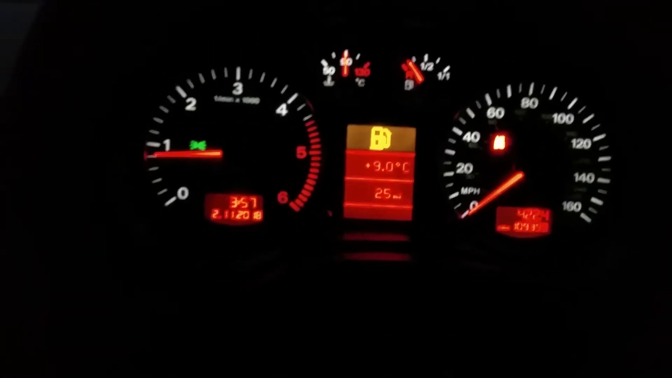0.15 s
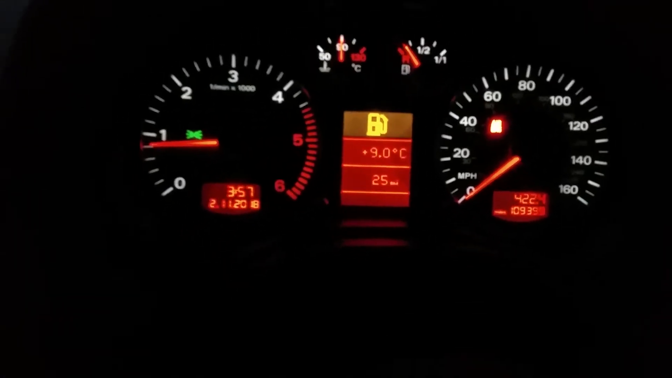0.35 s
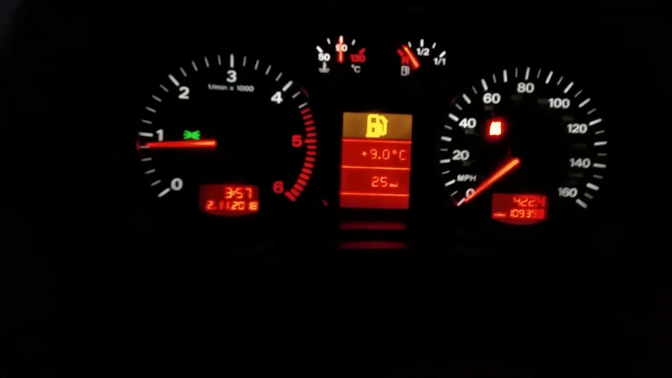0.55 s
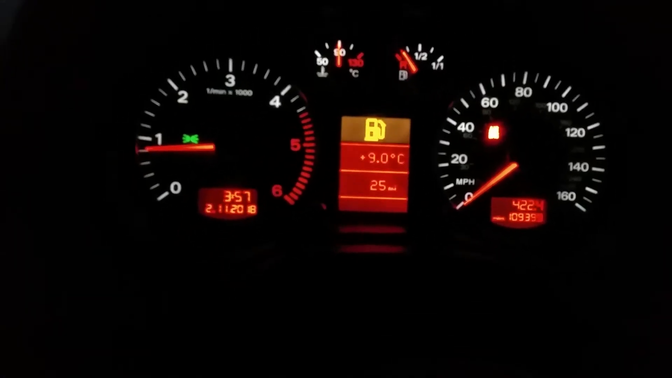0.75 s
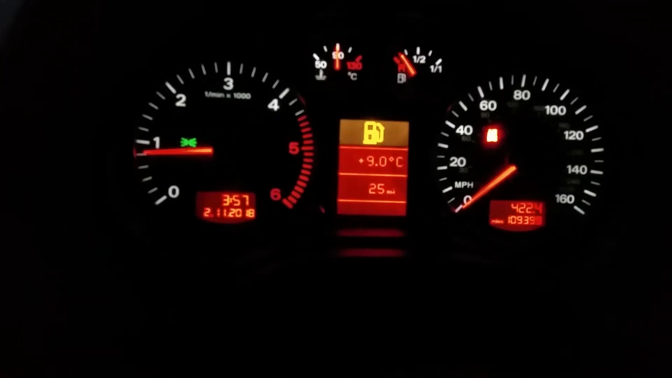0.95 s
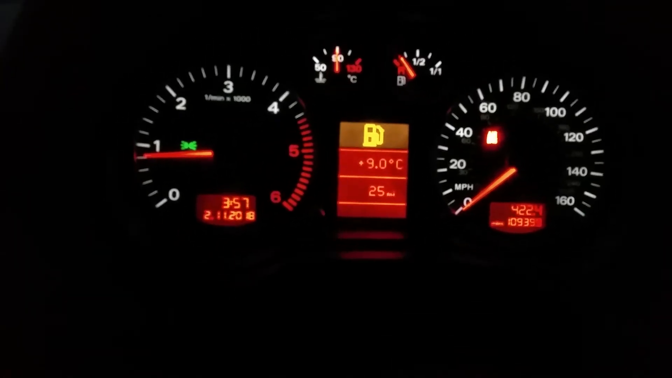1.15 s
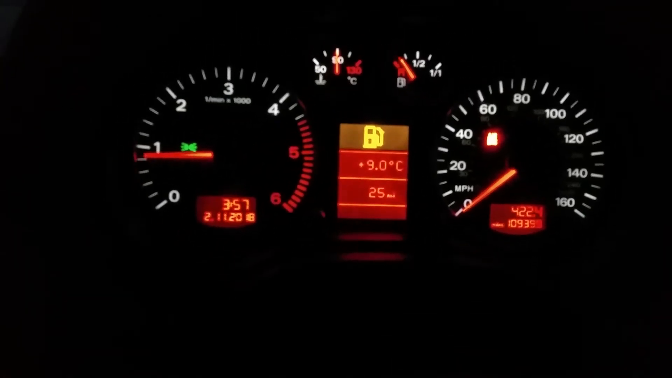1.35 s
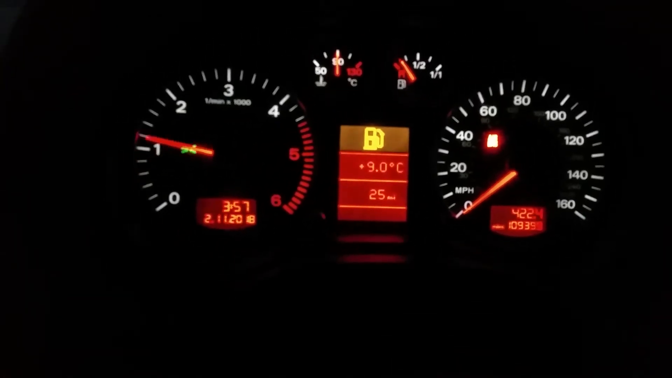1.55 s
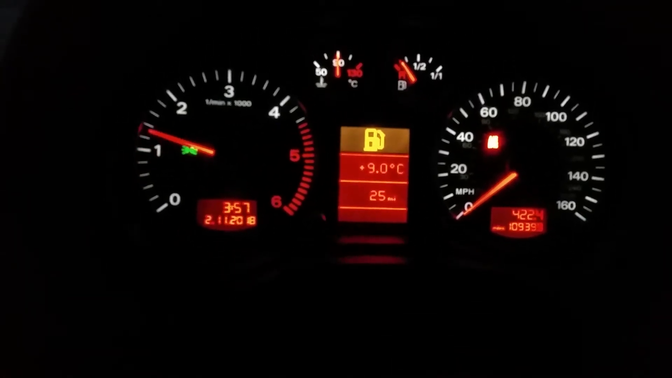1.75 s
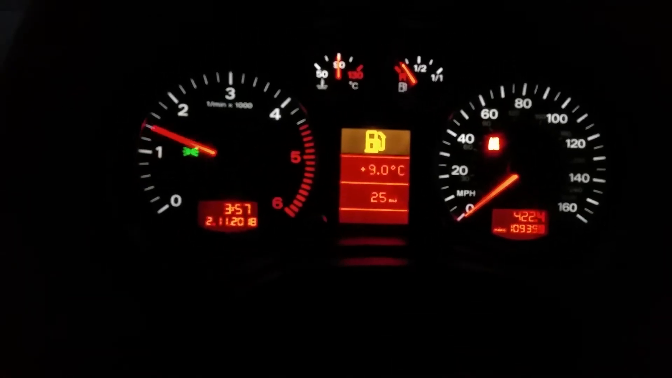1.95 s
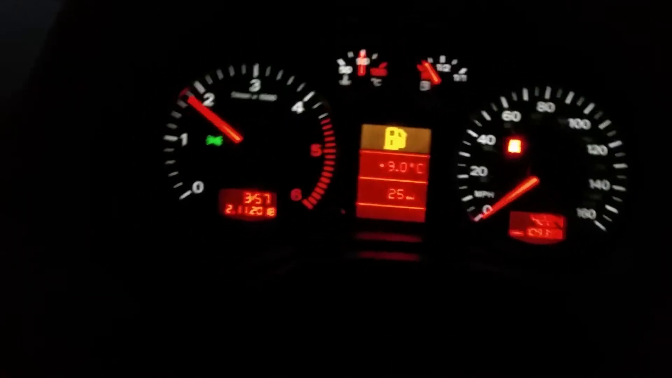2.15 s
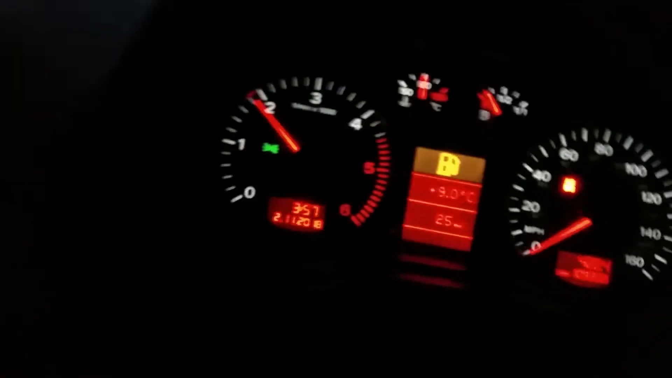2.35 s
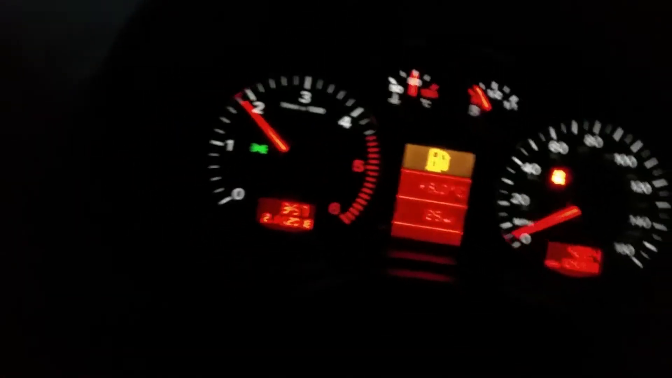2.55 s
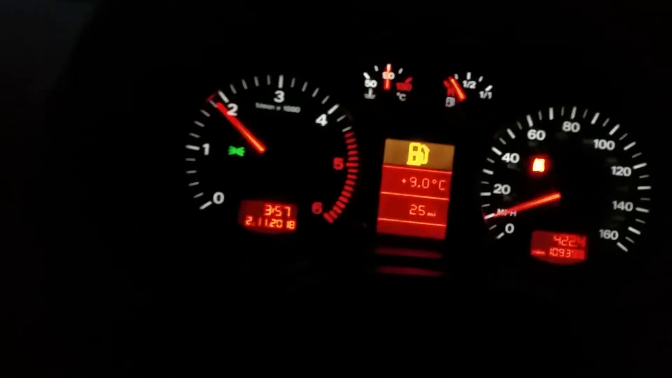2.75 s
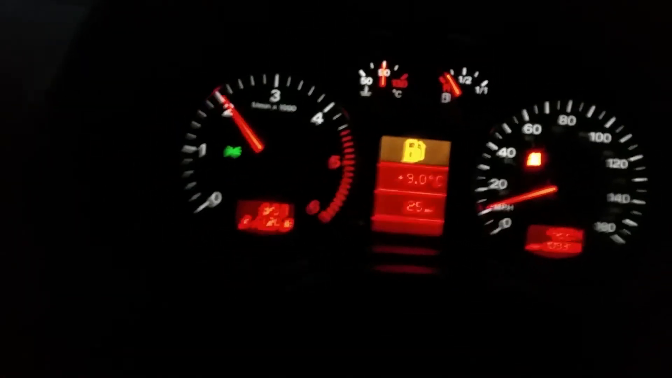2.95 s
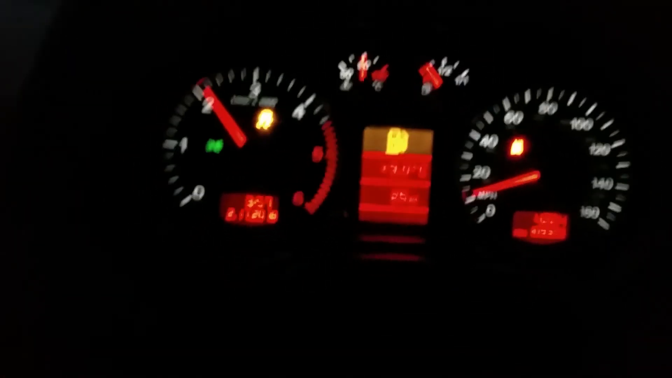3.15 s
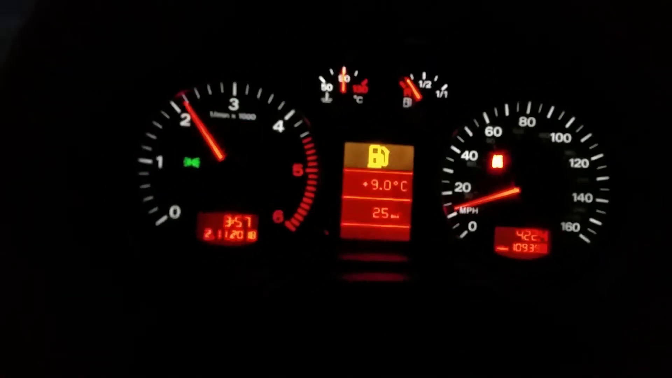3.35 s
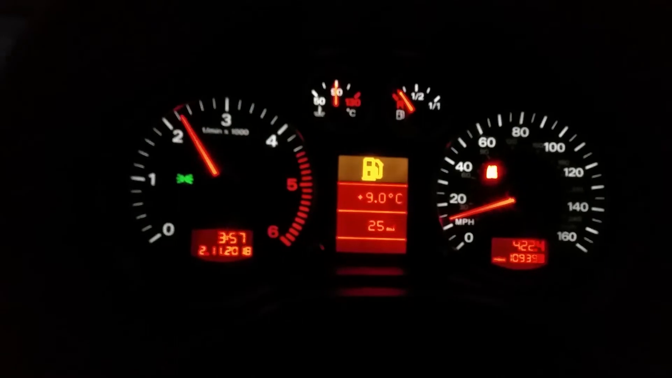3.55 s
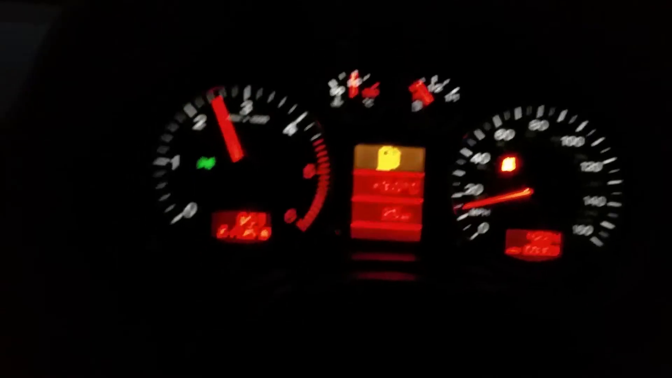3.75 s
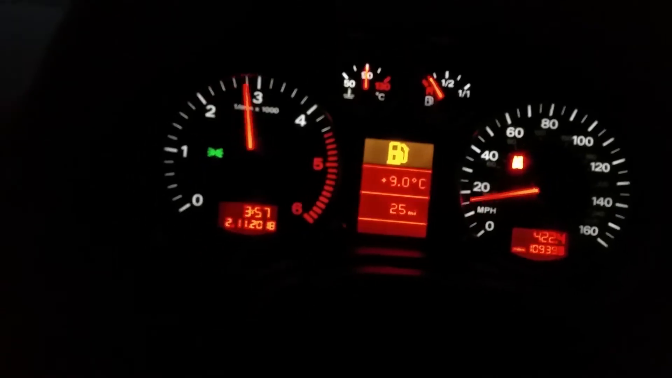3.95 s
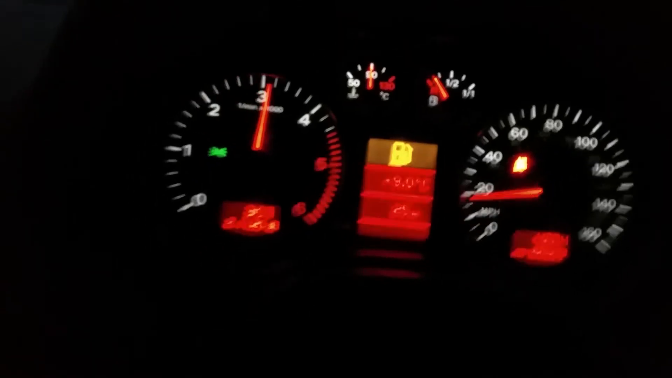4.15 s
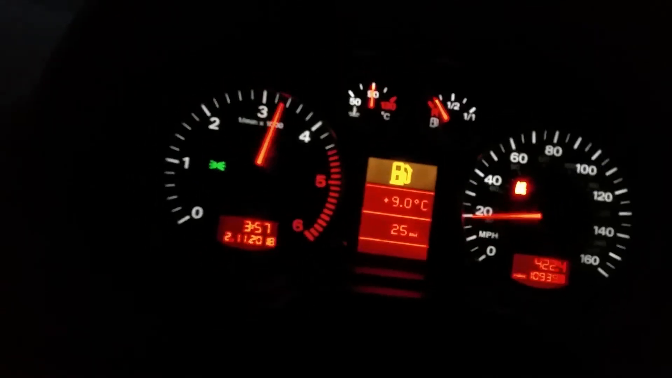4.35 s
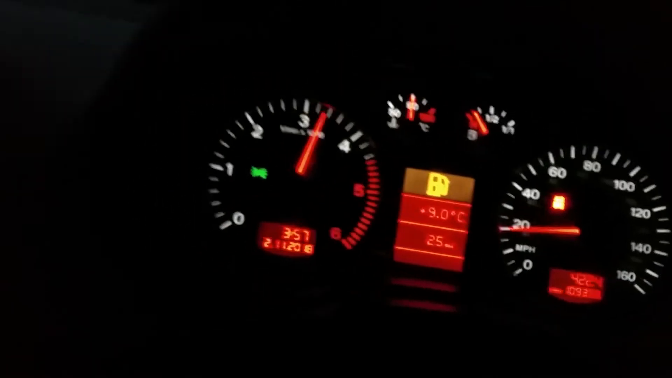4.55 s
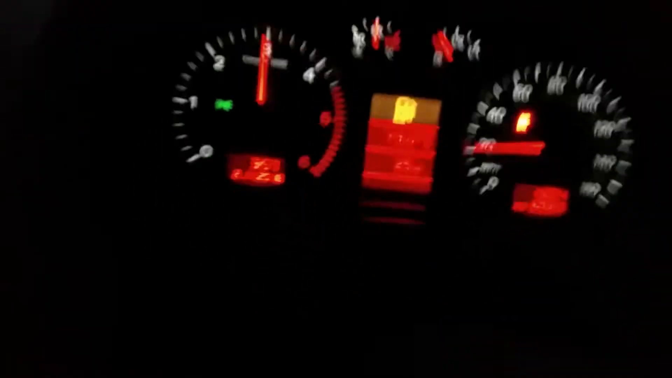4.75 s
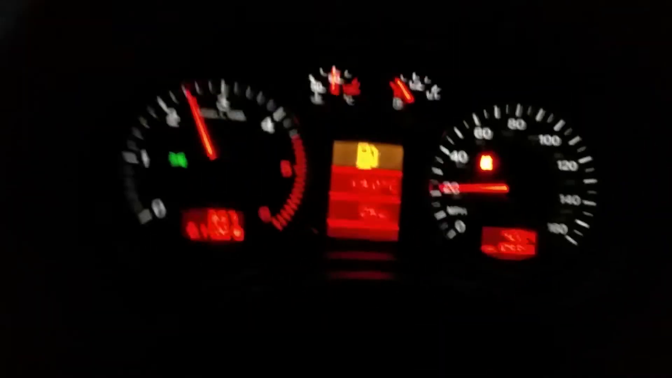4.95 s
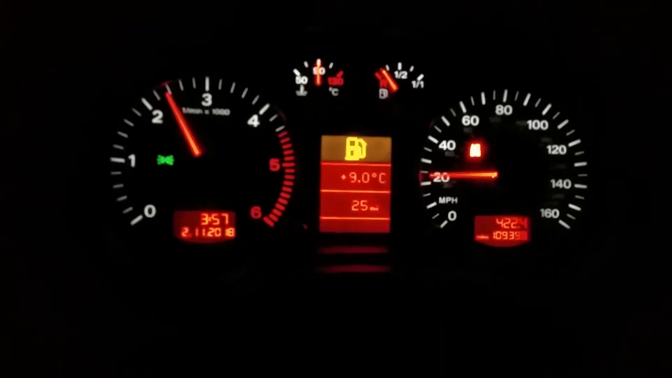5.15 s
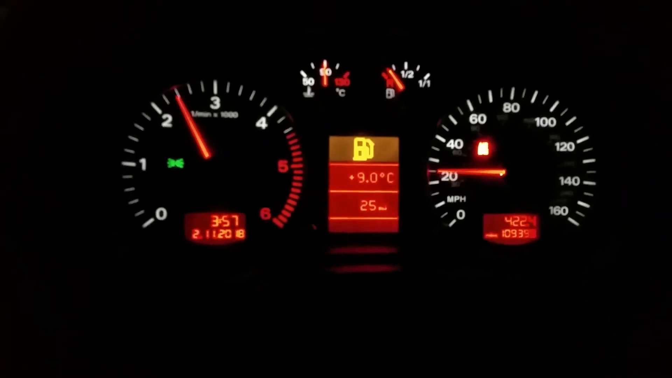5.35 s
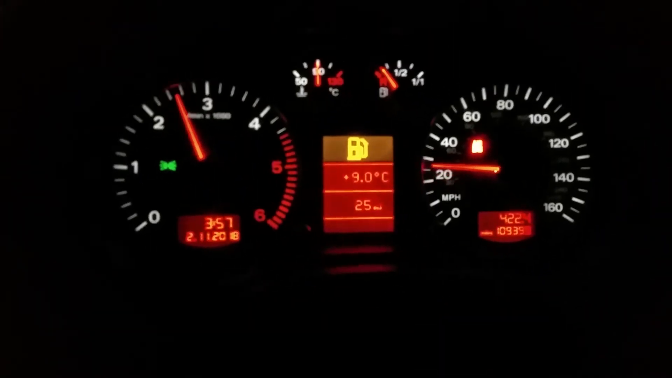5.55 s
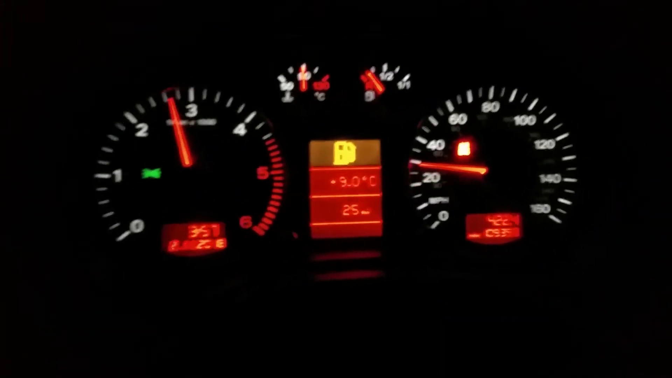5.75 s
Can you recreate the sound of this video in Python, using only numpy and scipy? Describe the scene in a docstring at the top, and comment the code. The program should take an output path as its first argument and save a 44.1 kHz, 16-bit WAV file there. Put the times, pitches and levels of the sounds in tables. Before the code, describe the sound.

A muffled diesel idle with handling bumps and clicks swells into a heavy, bass-rich acceleration, dips at a gear change, then climbs again.

```python
"""A car engine idles, then booms and growls as the car pulls away hard and changes gear, heard inside the cabin.
The four-cylinder turbodiesel is a stack of steady tones locked to its firing rate; some make the cabin boom.
Shaped noise makes the road rumble, the muffled clatter and the microphone hiss.
Thuds are dying tones, fabric rubs are strokes of noise, trim clacks are noise bursts that ring the plastic,
and seat creaks are strings of tiny ticks. A short padded echo follows these small noises."""
import sys
import numpy as np
from scipy import signal
from scipy.io import wavfile
from scipy.ndimage import uniform_filter1d

SR = 44100
rng = np.random.default_rng(int(sys.argv[2]) if len(sys.argv) > 2 else 0)


def materialize(psi):
    """Save the field psi as 16-bit PCM at rate SR to the path in sys.argv[1].

    A 1-D psi becomes a single channel; in a 2-D psi each row is a channel.
    """
    bounded = np.clip(np.atleast_2d(psi).T, -1, 1)
    quanta = np.round(bounded * 32767).astype(np.int16)
    wavfile.write(sys.argv[1], SR, quanta)


N = 255780  # length in samples

# The engine over time. Each row: time in seconds, firing rate in Hz, boom of the first firing order in dB,
# load on the engine, given as the level of its growl in dB.
ENGINE_COURSE = [(0, 28.37, -79, -42), (1.19, 27.64, -54, -58.5), (1.39, 43.4, -40, -40.5),
                 (1.5, 49.5, -31.5, -54.5), (1.62, 47.76, -31, -59), (1.79, 45.27, -40.5, -50.5),
                 (1.96, 54.9, -27.5, -45), (2.1, 65.06, -57, -33.5), (2.21, 64.53, -21.5, -35.5),
                 (2.47, 58.14, -16.5, -35.5), (2.82, 72.38, -14, -33), (3.1, 73.38,  -16.5, -31),
                 (3.41, 76.26, -21, -30.5), (3.5, 80.3, -42, -35), (3.62, 87.9, -34, -24.5),
                 (3.83, 98.85, -14.5, -25), (3.98, 108.3, -19, -17.5), (4.12, 117.4, -26.5, -19.5),
                 (4.22, 115.4, -17, -26.5), (4.51, 106.2, -14.5, -31.5), (4.62, 93.8, -24.5, -25),
                 (4.77, 71.22, -21, -34), (4.94, 75.6, -21.5, -31), (5.23, 82.8, -26, -26),
                 (5.38, 86.2, -15, -21), (5.8, 96.95, -22, -23)]
# Panels and cabin air that ring when an engine order crosses them. Each row: pitch in Hz, width in Hz, boost in dB.
BODY_RESONANCES = [(44.6, 3.6, 5.5), (115.7, 9.7, 4), (171, 40, -2.5), (225, 23, -8), (262.2, 16, 0.5),
                   (355, 28, -5), (406.3, 22, -6), (465, 60, -13), (710, 170, -21)]
# How the cabin passes the second firing order. Each row: pitch in Hz, level over the growl in dB.
SECOND_ORDER = [(56, -34), (86, -11), (93, 23.5), (102, 8.5), (120, 16), (148, 4), (176, 0.5), (198, -9),
                (230, -7.5)]
# The same for the third order, when the load is FULL_DB. Each row: pitch in Hz, level over the growl in dB.
THIRD_ORDER = [(120, -19), (175, 4.5), (222, 0.5), (262, -1.5), (325, -5.5), (348, -9.5)]
# Levels of the engine lines over the growl, in dB: whole orders, then those 1/4, 2/4 and 3/4 above a whole order.
QUARTER_LEVELS = [-3, -4.5, -9, -2]
# Rumble of road and body over time. Each row: time in seconds, level in dB.
RUMBLE_COURSE = [(0, -39), (.5, -34.5), (1.1, -36.5), (1.9, -37.5), (2.06, -20), (2.3, -22), (2.9, -17.5),
                 (3.4, -19), (3.55, -22.5), (4.1, -17.5), (4.55, -18), (4.9, -16.5), (5.8, -18.5)]
# Tone colour of the rumble. Each row: pitch in Hz, relative level per Hz in dB.
RUMBLE_COLOUR = [(21, -36), (36, 13), (45, 10.5), (100, 11), (155, 6), (250, 0), (400, -9.5), (700, -58)]
# Tone colour of the clatter. Each row: pitch in Hz, relative level per Hz in dB.
CLATTER_COLOUR = [(420, -5.5), (800, -11.5), (1150, -15), (1500, -21.5), (2100, -24.5), (2900, -34.5),
                  (3450, -30), (4000, -42), (5500, -42.5), (7500, -61), (12000, -88)]
# Two panels that hum along with the clatter. Each row: pitch in Hz, width in Hz, level over the clatter in dB.
HUMMING_PANELS = [(201.5, 16, -8), (412.8, 45, -15)]
# Tone colour of the microphone hiss. Each row: pitch in Hz, relative level per Hz in dB.
HISS_COLOUR = [(2000, -51), (4000, -5), (7200, -14.5), (11000, -8.5), (16000, -19)]
# How alike noise is left and right. Each row: pitch in Hz, likeness (1 is the same, below 0 is opposed).
LIKENESS = [(60, 0.88), (130, 1), (290, 0.82), (640, 0.67), (1410, -0.5), (3100, 0.24), (7000, -0.37)]
# How noise leans to one side. Each row: pitch in Hz, left minus right in dB.
SIDE_LEAN = [(60, 3), (500, 6), (1300, -1.5), (4400, 0.5), (10000, 3)]
# Bumps through seat and floor. Each row: start in seconds, level in dB, ring in Hz,
# time in seconds to die by 60 dB.
THUDS = [(0.136, -18, 118, 0.059), (0.379, -18.5, 128, 0.24), (0.406, -8.5, 135.4, 0.095),
         (0.458, -23.5, 149, 0.16), (0.656, -17.5, 129.5, 0.21), (0.772, -21.5, 144, 0.21),
         (0.824, -23.5, 85.4, 0.22), (2.047, -23, 142, 0.062), (2.061, -10, 40.5, 0.82),
         (2.573, -15.5, 111, 0.19), (4.726, -13, 73.4, 0.12)]
# Fabric slides. Each row: start in seconds, length in seconds, level in dB, brightest pitch in Hz,
# left minus right in dB.
RUBS = [(0.359, 0.1, -59.5, 2000, -2), (0.549, 0.14, -53, 2150, -3), (0.565, 0.048, -43.5, 3970, 1),
        (0.678, 0.069, -51, 4060, -1), (1.125, 0.07, -71, 4150, 1), (2.026, 0.037, -49.5, 5080, 3),
        (2.365, 0.052, -44, 2020, 0.5), (2.501, 0.12, -51.5, 1880, -3), (3.453, 0.075, -43.5, 4693, 0.5),
        (3.581, 0.084, -61, 5870, 13), (4.025, 0.021, -45.5, 5100, -2), (4.154, 0.14, -61, 4900, 4),
        (4.36, 0.15, -46, 2090, -2), (4.53, 0.19, -51.5, 2260, -4)]
# Knocks of loose trim. Each row: start in seconds, peak of the crack in dB, pitch in Hz that the blow favours,
# peak of the hollow low ring in dB, left minus right in dB.
CLACKS = [(0.3758, -50, 2270, -27, 3), (0.408, -57, 1630, -22, 6), (0.4496, -67, 1700, -29.5, 1),
          (0.6397, -38, 1690, -19.5, 4), (0.831, -38.5, 1750, -33, -1), (1.124, -36.5, 2650, -32.5, -4.5),
          (1.4343, -17.5, 3700, -17.5, -5.5), (1.455, -24, 2040, -29, 4), (1.481, -33, 2230, -38, -4),
          (1.507, -33, 2430, -35, -6), (2.03, -14.5, 1750, -17.5, -2), (2.425, -15, 2150, -61, -2),
          (3.2512, -31.5, 1759, -28, -15.5), (3.4784, -31, 1750, -19, 4), (4.1319, -22.5, 3700, -42, -14.5),
          (4.1534, -22.5, 1681, -39, 2), (4.3257, -26.5, 2150, -26, -3), (4.403, -20, 2076, -34, -3),
          (4.4386, -13.5, 2200, -20, -2), (4.46, -23.5, 3544, -28, -19), (4.476, -15.5, 1963, -40, -1.5),
          (4.7161, -24.5, 2730, -42, -3.5), (4.9154, -56, 1611, -21, 4.5)]
# Ringing modes of the plastic trim. Each row: pitch in Hz, width in Hz, relative level in dB.
TRIM_MODES = [(590, 300, 31), (780, 150, 14.5), (1300, 400, 9), (1750, 420, 3.5), (2150, 410, -4.5),
              (2630, 1250, -3.5), (3700, 240, 1), (5170, 580, -11), (8100, 3100, -18)]
# Single stick-slip ticks. Each row: start in seconds, level of the knock in dB, level of its treble edge in dB,
# left minus right in dB.
TICKS = [(2.5498, -22.5, -47, -17), (2.5673, -38, -55, -1), (2.5823, -21, -56, -5), (2.5923, -22, -38, -7),
         (3.0747, -20.5, -65, 0), (3.2375, -21, -55, -3), (3.6040, -15, -23, 6), (4.1785, -20, -49, 3),
         (4.4172, -27, -50, -5), (4.4952, -31, -46, -6), (4.5301, -13, -34, -16), (4.5412, -19, -36, -19),
         (4.5542, -13.5, -52, -6), (4.5607, -11, -50, -10), (4.5646, -23, -56, -13),
         (4.5900, -22, -54, -19), (4.6015, -18.5, -58, -17), (4.6075, -35, -62, -8),
         (4.6200, -30, -50, -12), (4.6329, -15.5, -47, -14), (4.6582, -15.5, -50, -6),
         (4.6668, -19, -40, -12), (4.7178, -25, -22, -14), (5.0114, -25, -65, -3)]

# Engine: STEP is the number of samples between updates of the line levels.
STEP = 100
# The third order gains extra dB per dB of load above FULL_DB; orders 5 and 6.5 get extra dB of their own.
FULL_DB, THIRD_PER_LOAD, FIFTH_DB, SIX_HALF_DB = -23, 0.4, 6, 16
# Clatter: its level in dB at IDLE_HZ firings per second, its growth with engine speed, and dB per dB of load.
IDLE_HZ, CLATTER_IDLE_DB, CLATTER_DB_PER_OCTAVE, CLATTER_PER_LOAD = 30.2, -42, 6, 0.089
# Thuds: pitch of a second ring as a multiple of the first, and its level over the first; together they throb.
THUD_OVERTONE, THUD_OVERTONE_DB = 1.6, -7
# Clacks: seconds for crack and rattle to die by 60 dB, gain of the rattle, level of the snap over the crack in dB.
CRACK_T60, RATTLE_T60, RATTLE_SHARE, SNAP_DB = .02, .12, .25, -26.5
# Ticks: width of the rounded push in seconds; pitch, seconds to die by 60 dB and gain of the brief ring.
PUSH_S, TICK_HZ, TICK_T60, TICK_RING = 0.00013, 1940, 0.0017, 0.84
# Faint ticks: how many a second, middle levels of knock and treble edge in dB, second from which the car rolls.
FAINT_PER_S, FAINT_DB, FAINT_EDGE_DB, ROLLING_S = 5, -38, -64, 2.1
EAR_LAG = 17  # samples by which side sound reaches the left microphone late; also delays each tick's treble edge
HISS_DB, EDGE_HZ = -67, 16450  # hiss level in dB; top of the microphone's range in Hz


def amp(db):
    """Turns decibels into a gain."""
    return 10 ** (np.asarray(db) / 20)


def evened(x):
    """Scales a sound to an average (rms) strength of 1."""
    return x / np.sqrt(np.mean(x ** 2) + 1e-20)


def read(points, hz):
    """Reads a curve over pitch; pitch steps count as ratios, as in hearing."""
    f, value = np.transpose(points)
    return np.interp(np.log(hz + 1), np.log(f + 1), value)


def columns(rows):
    """Turns each column of a time table into a curve with one value a sample."""
    s, *rest = np.transpose(rows)
    return [np.interp(np.arange(N) / SR, s, c) for c in rest]


def add(mix, s, sound, pan_db):
    """Mixes in a two-channel sound at time s, louder on the left for positive pan_db."""
    part = mix[:, round(s * SR):][:, :sound.shape[-1]]
    sides = amp([[pan_db / 2], [-pan_db / 2]])
    part += (sound * sides)[:, :part.shape[1]]


def ring(x, hz, width):
    """Passes sound through one resonance, with gain 1 at its peak."""
    sharpness = max(hz / width, .3)
    return signal.lfilter(*signal.iirpeak(min(hz, SR / 2.5), sharpness, SR), x)


def ring_twice(x, hz, width, wider):
    """Passes sound through a resonance and then a wider one at the same pitch."""
    return ring(ring(x, hz, width), hz, wider)


def waver(depth):
    """Makes a slow random swell, one value every STEP samples; depth is its rms size."""
    return depth * evened(uniform_filter1d(rng.standard_normal(N // STEP + 1), size=60))


def every_sample(values):
    """Fills in the values between updates that come every STEP samples."""
    return np.interp(np.arange(N) / STEP, np.arange(len(values)), values)


def noise(colour, patchy_db, size=2048):
    """Makes coloured noise with drifting patches, as alike left and right as the cabin makes it."""
    frames, hz = 4 * N // size + 5, np.fft.rfftfreq(size, 1 / SR)
    a, b, c, d, patches = rng.standard_normal((frames, len(hz), 5)).T
    patches = uniform_filter1d(uniform_filter1d(patches, size=6, axis=0), size=6, axis=1)
    same = np.clip(read(LIKENESS, hz), -1, 1)[:, None]
    lean = amp(read(SIDE_LEAN, hz)[:, None] / 2)
    left = a + 1j * b
    right = same * left + np.sqrt(1 - same ** 2) * (c + 1j * d)
    spectrum = np.array([left * lean, right / lean])
    spectrum *= amp(read(colour, hz)[:, None] + patchy_db * evened(patches))
    return evened(signal.istft(spectrum, nperseg=size, noverlap=3 * size // 4)[1][:, :N])


def sideways(x, own):
    """Puts one sound at two microphones, the left a little late, plus what only each one hears."""
    return np.array([np.roll(x, EAR_LAG), x]) + own


def struck(blow, modes, favoured_hz):
    """Rings trim modes with a blow, to peak 1; where it is hit picks the modes."""
    sound = 0
    for f, width, db in modes:
        octaves_off = min(abs(np.log2(f / favoured_hz)), 2.6)
        sound = sound + amp(db - 8.3 * octaves_off) * ring_twice(blow, f, width, 3 * width) / np.sqrt(width)
    return sound / abs(sound).max()


def engine():
    """Firing orders boom; cylinders differ, so lines also stand at each quarter of the firing rate."""
    hz, first_db, growl_db = columns(ENGINE_COURSE)
    hz = uniform_filter1d(hz, size=2000)
    firings = np.cumsum(hz) / SR + every_sample(waver(.018))  # the crank runs a little unevenly
    first_db = first_db + every_sample(waver(2.2))
    second_db = growl_db + read(SECOND_ORDER, 2 * hz) + every_sample(waver(2.8))
    third_db = growl_db + THIRD_PER_LOAD * (growl_db - FULL_DB) + read(THIRD_ORDER, 3 * hz)
    third_db = third_db + every_sample(waver(2.5))
    first = amp(first_db) * np.cos(2 * np.pi * firings)
    second = amp(second_db) * np.sin(4 * np.pi * firings)
    third = amp(third_db) * np.cos(6 * np.pi * firings + [[0], [.9]])  # the two sides are out of step
    out = np.sqrt(2) * (first + second + third)

    grid = np.arange(1., 1300)
    body = np.sqrt(sum(amp(2 * db) / (1 + (2 * (grid - f) / w) ** 2) ** 2 for f, w, db in BODY_RESONANCES))
    for quarter in [*range(2, 32), *range(32, 49, 2)]:
        if quarter in (4, 8, 12):  # the first three whole orders are made above
            continue
        start, shift = rng.random(2)
        if quarter % 4 == 0:
            start *= .25  # whole orders keep nearly in step, so each firing is a pulse
        extra_db = {20: FIFTH_DB, 26: SIX_HALF_DB}.get(quarter, 0)
        # each line swells by itself
        order_db = growl_db[::STEP] + QUARTER_LEVELS[quarter % 4] + extra_db + waver(3)
        level = amp(order_db) * np.interp(hz[::STEP] * quarter / 4, grid, body)
        apart = np.array([[0], [(shift - .5) * min(quarter / 48, .5)]])  # higher lines part between the ears
        line = np.cos(2 * np.pi * (quarter / 4 * firings + start + apart))
        out += every_sample(level) * line

    speed_db = CLATTER_DB_PER_OCTAVE * np.log2(hz / IDLE_HZ)
    clatter_db = CLATTER_IDLE_DB + speed_db + CLATTER_PER_LOAD * (growl_db - growl_db[0])
    return out * amp([[1.5], [-1.5]]), firings, clatter_db


def road_rumble():
    """Tyres and mounts shake the body: low noise whose level follows the ride."""
    rumble_db, = columns(RUMBLE_COURSE)
    return amp(rumble_db) * noise(RUMBLE_COLOUR, 2.5, size=4096)


def combustion_clatter(firings, clatter_db):
    """Combustion noise comes through the bulkhead, puffing with each firing, and panels hum along."""
    puffs = evened(1 + 0.14 * np.cos(2 * np.pi * firings))
    clatter = noise(CLATTER_COLOUR, 1.88, size=1024)
    hum = sum(amp(db) * evened(ring_twice(clatter, hz, width, 2 * width)) for hz, width, db in HUMMING_PANELS)
    return amp(clatter_db) * (puffs * clatter + hum)


def add_thuds(mix):
    """A bump through seat or floor: two low tones start softly and die away together."""
    t = np.arange(SR // 4) / SR
    for s, db, hz, t60 in THUDS:
        fade = np.cos(np.pi / 2 * t / t[-1])  # reaches silence at the end
        push = np.minimum(t / 0.0036, 1) * amp(db - 60 * t / t60) * fade
        overtone = amp(THUD_OVERTONE_DB) * np.sin(2 * np.pi * THUD_OVERTONE * hz * t)
        thud = push * (np.sin(2 * np.pi * hz * t) + overtone)
        add(mix, s, thud * np.ones((2, 1)), 3.1)


def add_rubs(mix):
    """Fabric slides: uneven noise, coloured by the cloth and the trim modes, in one short stroke."""
    t = np.arange(SR // 4) / SR
    for s, length, db, hz, pan in RUBS:
        unevenness = amp(3.5 * evened(uniform_filter1d(rng.standard_normal(len(t)), size=180)))
        a, b, c = rng.standard_normal((3, len(t))) * unevenness
        grit = sideways(a, 1.6 * np.array([b, c]))
        stroke = np.clip(np.minimum(t / 0.0041, (length - t) / 0.021), 0, 1)
        body = 0
        for k, (f, width, level) in enumerate(TRIM_MODES[1:]):
            shifted = np.roll(grit, 40 * k, axis=1)  # so the modes do not move in step
            body = body + amp(level) * evened(ring_twice(shifted, f, width, 2 * width))
        bright = evened(ring_twice(grit, hz, 1000, 6400))
        treble = 1.06 * min(hz / 4000, 1) ** 3 * evened(ring(grit, 5900, 7300))  # less of it in dull rubs
        add(mix, s, amp(db) * stroke * (bright + 0.44 * body + treble), pan)


def add_clacks(mix):
    """Loose trim knocks: a noisy crack, then a duller rattle, rings the plastic; a bright snap tops it."""
    t = np.arange(3000) / SR
    for s, db, hz, low_db, pan in CLACKS:
        a, b, c = rng.standard_normal((3, 3000))
        shake = sideways(a, .9 * np.array([b, c])) * np.minimum(t / 0.0022, 1)
        rattle = RATTLE_SHARE * ring(shake, 1700, 4500) * amp(-60 * t / RATTLE_T60)
        blow = shake * amp(-60 * t / CRACK_T60) + rattle
        snap = amp(db + SNAP_DB - 60 * t / 0.025) * ring(shake, 10000, 10000)
        crack = amp(db) * struck(blow, TRIM_MODES[2:], hz)
        hollow = amp(low_db) * struck(blow, TRIM_MODES[:2], 950)
        add(mix, s, crack + hollow + snap, pan)


def faint_ticks():
    """Once the car rolls, trim ticks faintly at random moments; rows are like those of TICKS."""
    rolling = N / SR - ROLLING_S
    when, size, side = rng.random((round(FAINT_PER_S * rolling), 3)).T
    size_db = 12 * (size - .5)
    return list(zip(ROLLING_S + when * rolling, FAINT_DB + size_db, FAINT_EDGE_DB + size_db, 16 * (side - .7)))


def add_ticks(mix):
    """Stick-slip: each sudden slip is one short rounded push, then a brief ring."""
    t = np.arange(600) / SR
    click = 1. * (np.arange(600) == 0)
    u = t - 4 * PUSH_S  # time from the middle of the push
    tick_ring = (u > 0) * np.sin(2 * np.pi * TICK_HZ * u) * amp(-60 * abs(u) / TICK_T60)
    knock = np.exp(-.5 * (u / PUSH_S) ** 2) - TICK_RING * tick_ring
    edge = np.roll(ring_twice(click, 16000, 5000, 9000), EAR_LAG)
    for s, db, edge_db, pan in TICKS + faint_ticks():
        # smaller slips follow the first
        slips = click + .15 * rng.standard_normal(600) * amp(-60 * t / .02) * (rng.random(600) < .05)
        shape = amp(db) * knock / knock.max() - amp(edge_db) * edge / edge.max()
        tick = np.convolve(slips, shape)
        # the left microphone hears it through the casing, which smears it
        smear = click + .3 * rng.standard_normal(600) * amp(-60 * t / 0.0062)
        left = np.convolve(tick, smear / np.linalg.norm(smear))[:len(tick)]
        add(mix, s, np.array([left, tick]), pan)


def upholstery(x):
    """A short, padded cabin tail: sparse echoes dying fast, different ones for each ear."""
    t = np.arange(SR // 8) / SR
    signs = rng.choice([-1., 1.], (2, len(t)))
    sparse = rng.random((2, len(t))) < .05
    taps = signs * sparse * amp(-60 * t / 0.11) * (t > .002)
    return signal.fftconvolve(x, taps / np.linalg.norm(taps[0]), axes=1)[:, :N]


def scene():
    """Adds up engine, ride and the small noises of the cabin with their tail."""
    motor, firings, clatter_db = engine()
    ride = road_rumble() + combustion_clatter(firings, clatter_db)
    near = np.zeros((2, N))
    add_thuds(near)
    add_rubs(near)
    add_clacks(near)
    add_ticks(near)
    dull = signal.lfilter(*signal.butter(2, (500, 6000), "band", fs=SR), near)
    return motor + ride + near + amp(-8) * upholstery(dull)


def record(dry):
    """Microphone hiss, soft overload on the loudest booms, then the band limit."""
    wet = dry + amp(HISS_DB) * noise(HISS_COLOUR, .8, size=1024)
    wet = 1.1 * np.tanh(wet / 1.1)
    band_limit = signal.firwin(511, EDGE_HZ, window=("kaiser", 9), fs=SR)
    return signal.oaconvolve(wet, band_limit[None], "same")


dry = scene()
out = record(dry)
materialize(out)
```